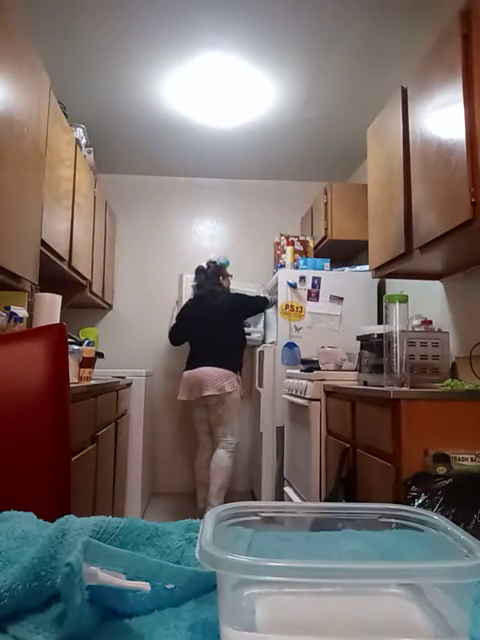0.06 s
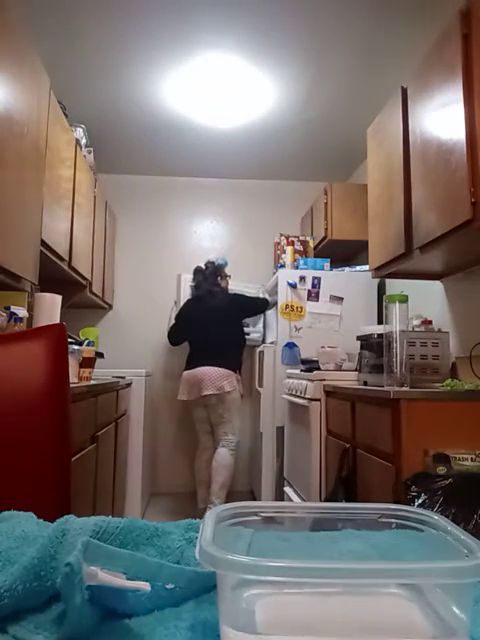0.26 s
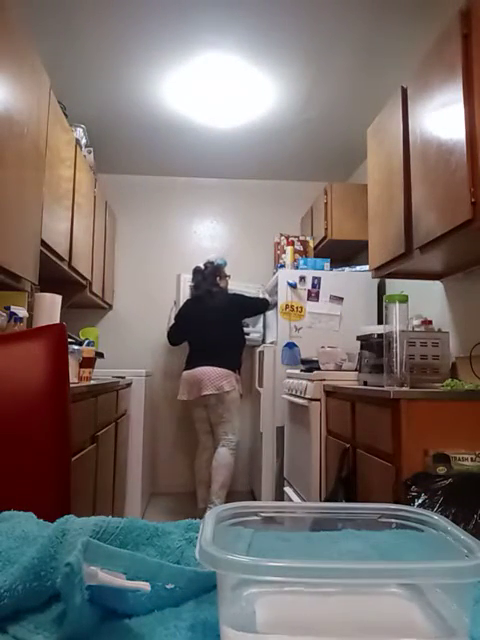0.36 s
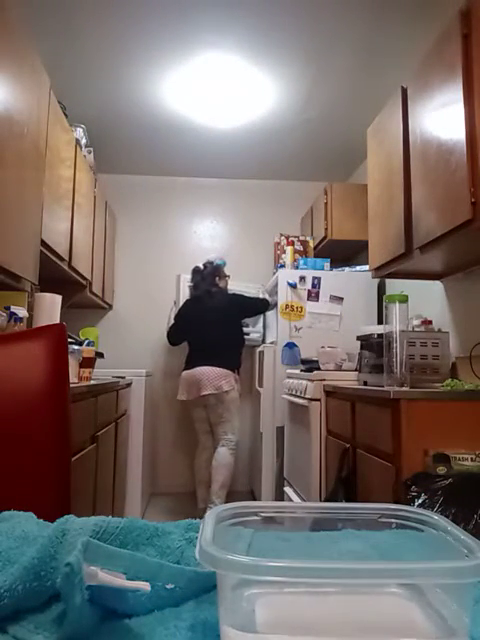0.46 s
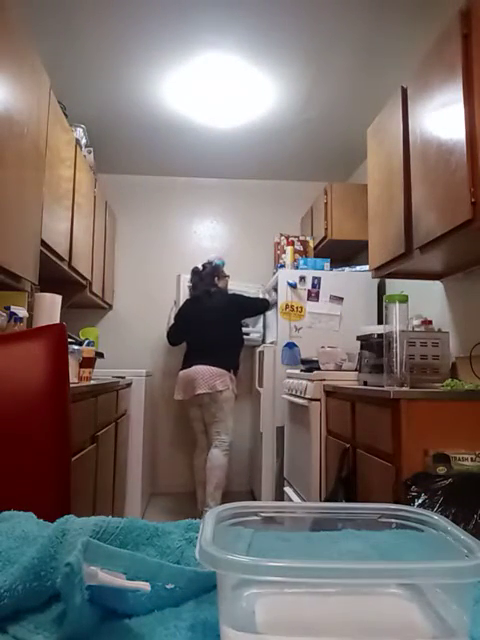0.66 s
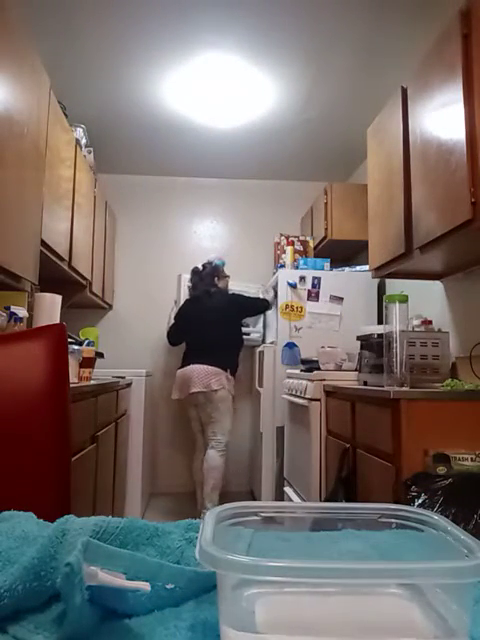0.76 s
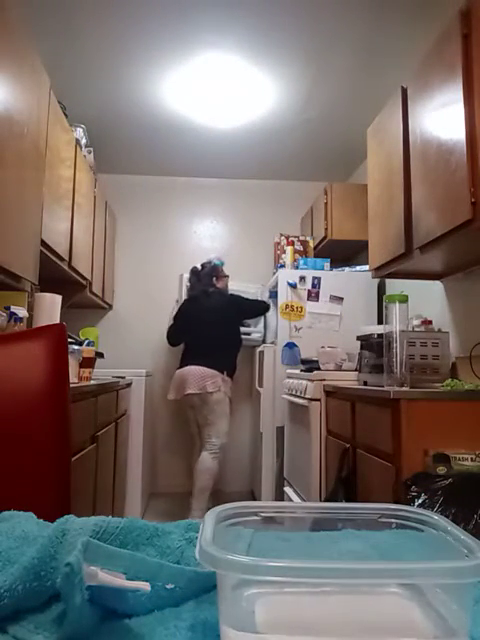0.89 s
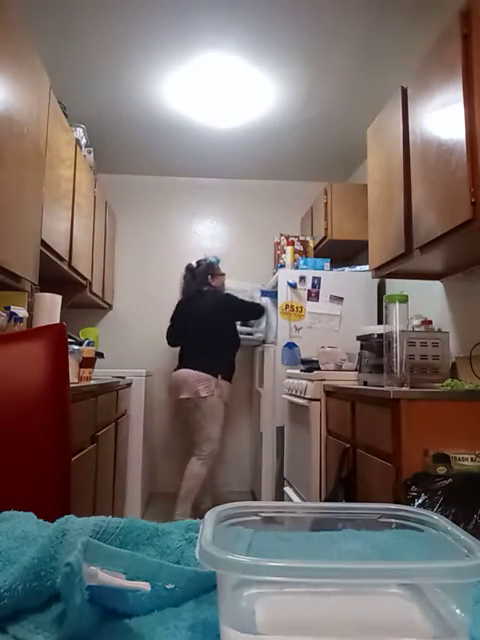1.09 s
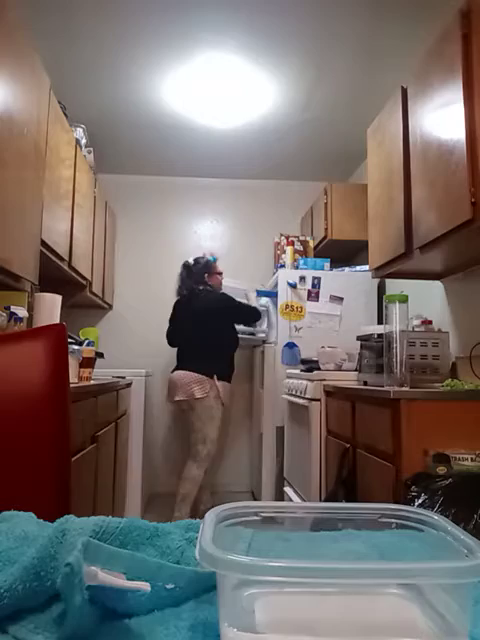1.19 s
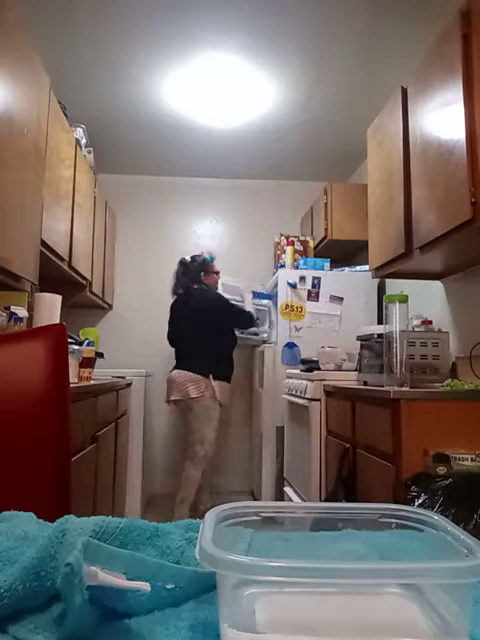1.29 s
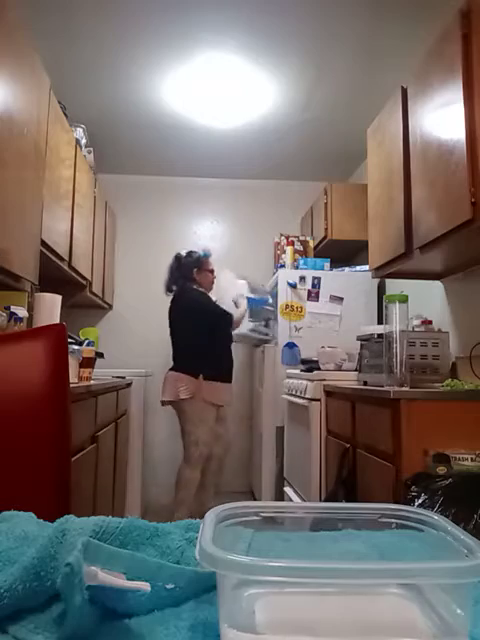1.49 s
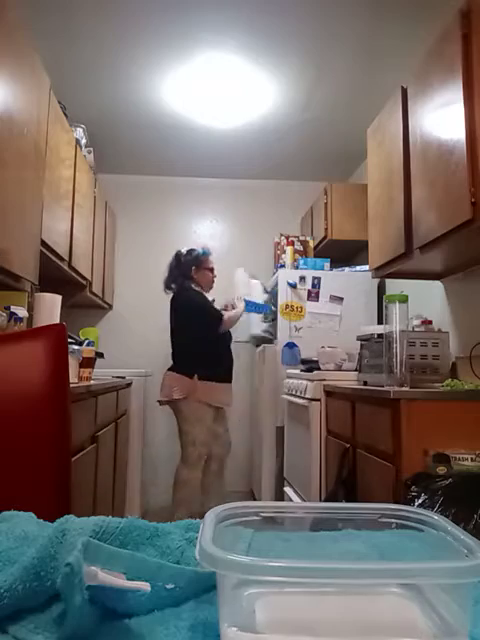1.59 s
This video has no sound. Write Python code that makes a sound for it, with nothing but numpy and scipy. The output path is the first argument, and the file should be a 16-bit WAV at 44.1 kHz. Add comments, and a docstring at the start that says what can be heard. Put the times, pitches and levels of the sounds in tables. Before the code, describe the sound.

Plastic containers clatter and thump as someone rummages in a humming kitchen freezer.

```python
"""Hard plastic containers are handled in an open freezer, heard across a small, hard-walled kitchen.
The freezer's fan and motor hum throughout. Plastic snaps and clinks, containers knock and the cabinet
thumps: each hit is a short burst plus fading tones. Many tiny slips make the shelf rumble under a
dragged load, a package rustle as it slides out and a container scrape. The container also strikes home
with one dry click. All the handling echoes off the kitchen walls."""
import sys
import numpy as np
from scipy import signal
from scipy.fft import rfft, irfft, next_fast_len
from scipy.io import wavfile
from scipy.ndimage import map_coordinates

SR = 44100
rng = np.random.default_rng(int(sys.argv[2]) if len(sys.argv) > 2 else 0)


def master_out(mix):
    """Clip the mix to full scale and print it as 16-bit PCM to the path in sys.argv[1]."""
    frames = np.transpose(np.atleast_2d(mix))
    ceiling = np.clip(frames, -1, 1)
    pcm = np.round(ceiling * 32767).astype(np.int16)
    wavfile.write(sys.argv[1], SR, pcm)


N = 72765  # samples: 1.65 s

# tone colour of cracking plastic, for snaps and the clink: f/Hz, level/dB
CRACK_COLOUR = [(60, -19), (300, -3.5), (600, -2), (1300, -8), (2000, -2), (2700, -9.5), (4400, -5),
                (5900, -11), (7200, -5.5), (9400, -9.5), (11000, -1), (13500, -8), (15500, -14)]


def amp(db):
    """Turn decibels into a factor to multiply by."""
    return 10 ** (np.asarray(db) / 20)


def along(points, hz):
    """Read a curve of (frequency, value) points at hz, on a scale of octaves."""
    freqs, values = np.transpose(points)
    return np.interp(np.log(hz + 1), np.log(freqs + 1), values)


def norm(x):
    """Scale a sound to an energy of 1."""
    return x / (np.linalg.norm(x) + 1e-12)


def add(track, s, sound):
    """Mix a sound into the track at s seconds."""
    part = track[round(s * SR):][:len(sound)]
    part += sound[:len(part)]


def burst(colour, tilt_db=0, size=4096):
    """A short burst with this tone colour, made brighter by tilt_db per octave above 250 Hz."""
    hz = np.fft.rfftfreq(size, 1 / SR)
    levels_db = along(colour, hz) + tilt_db * np.log2(np.maximum(hz, 250))
    # folding the cepstrum (a transform of the levels) packs the energy at the start
    cepstrum = irfft(np.log(amp(levels_db)))
    cepstrum[1:size // 2] *= 2
    cepstrum[size // 2 + 1:] = 0
    return norm(irfft(np.exp(rfft(cepstrum))))


def ring(tones, size=4096, attack_s=0.00028):
    """A struck object's own tones, a little different at each hit; wider tones die sooner."""
    t = np.arange(size) / SR
    waves = np.zeros(size)
    for hz, width_hz, db in tones:
        fade = amp(db + rng.normal(0, 1)) * width_hz * np.exp(-np.pi * width_hz * t)
        waves += fade * np.sin(2 * np.pi * (hz * t + rng.random()))
    return norm(waves * (1 - np.exp(-t / attack_s)))


def kitchen(early_db, early_s):
    """Room echo: early echoes peak at early_s, early_db above a tail whose treble dies first."""
    # how long the echo takes to fall by 60 dB: f/Hz, t/s
    fade_times = [(100, 0.83), (300, 0.47), (1000, 0.4), (3000, 0.4), (7000, 0.24), (11000, 0.22),
                  (16000, 0.1)]
    hz, t, noise = signal.stft(rng.standard_normal(SR * 3 // 4), SR, nperseg=256)
    fade = amp(-60 * t / along(fade_times, hz)[:, None])
    tail = signal.istft(noise * fade, SR, nperseg=256)[1]
    t = np.arange(len(tail)) / SR
    tail *= 1 - np.exp(-t / 0.0033)
    early = rng.standard_normal(len(t)) * t * np.exp(-t / early_s)
    return norm(norm(tail) + amp(early_db) * norm(early))


def hit(crack, ringing, early_db, early_s, direct_db):
    """One hit across the room: crack and ring bounce off the walls; the ring also arrives straight."""
    heard = signal.fftconvolve(crack + ringing, kitchen(early_db, early_s))
    add(heard, 0, amp(direct_db) * ringing)
    return norm(heard) * np.sqrt(SR / 50)  # as much energy as 20 ms at full level


def rub(length_s, slip_sound, early_db, slips_per_s=900, spread_db=6):
    """Rubbing heard across the room: many tiny slips of random strength that swell and fade."""
    n = int(length_s * SR)
    slipping = rng.random(n) < slips_per_s / SR
    slips = slipping * rng.choice([-1, 1], n) * amp(spread_db * rng.standard_normal(n))
    rubbed = signal.fftconvolve(slips * np.hanning(n) ** 0.35, slip_sound)
    heard = signal.fftconvolve(rubbed, kitchen(early_db, early_s=0.0015))
    return norm(heard) * np.sqrt(n)  # as much energy as length_s at full level


def fan(level_db=-47.5):
    """The fan moves air with a steady rush."""
    # tone colour of the moving air: f/Hz, level/dB
    colour = [(30, -48), (50, -51), (70, -14.5), (100, -17), (130, -10), (177, -14.5), (240, -4.5),
              (300, -4.5), (400, -14), (510, -9), (670, -24), (890, -18), (1000, -30), (1100, -20.5),
              (1220, -44), (1450, -32), (1570, -27), (1820, -34), (2400, -20.5), (2700, -29.5),
              (3100, -24.5), (4600, -25.5), (5600, -30), (11000, -33.5), (15500, -40.5)]
    gains = amp(along(colour, np.fft.rfftfreq(N, 1 / SR)))
    air = irfft(rfft(rng.standard_normal(N)) * gains, N)
    return amp(level_db) * norm(air) * np.sqrt(N)


def motor(waver_db=1.6, waver_radians=0.13, wavers_per_s=14):
    """The motor hums with a few tones, each slightly unsteady in level and pitch."""
    # motor tones: f/Hz, level/dB
    tones = [(247.6, -53), (899, -60.5), (2040, -68.5), (2460, -64.5), (3063, -68), (3182, -68)]
    t = np.arange(N) / SR

    def wobble():
        """A smooth random curve."""
        points = rng.standard_normal(int(t[-1] * wavers_per_s) + 4)
        return map_coordinates(points, [t * wavers_per_s])

    out = np.zeros(N)
    for hz, db in tones:
        strength = amp(db + waver_db * wobble()) * np.sqrt(2)
        out += strength * np.sin(2 * np.pi * (hz * t + rng.random()) + waver_radians * wobble())
    return out


def shelf_rumbles():
    """The shelf rumbles under a dragged load."""
    # drags: t/s, length/s, level/dB
    drags = [(0.168, .06, -39), (.51, 0.055, -40.5), (1.099, 0.0954, -39.5)]
    # tone colour of the shelf: f/Hz, level/dB
    colour = [(30, -50), (120, -16), (205, -6), (245, 7.5), (290, -12), (450, -12.5), (800, -34.5),
              (4000, -71)]
    out = np.zeros(N)
    for s, length_s, db in drags:
        add(out, s, amp(db) * rub(length_s, burst(colour), early_db=8.5))
    return out


def container_knocks():
    """Containers bump the shelf with a hollow clack."""
    # bumps: t/s, level/dB, tilt/(dB per octave), ring/dB, early echo delay/s, early echo level/dB
    knocks = [(.231, -30.5, 0.5, -32, .0028, -5.5), (.246, -31.5, -0.5, -10.5, 0.0026, -5.5),
              (.303, -30.5, -1.5, -13, .0034, -2), (.385, -33, -4.5, -14, 0.0026, -6),
              (0.6335, -36, -1, -8.5, 0.0063, -13), (0.7211, -29.5, 1, -1, .0011, -5.5),
              (0.725, -25.5, 3.5, -0.5, 0.0021, -5.5), (.769, -34, 2.5, -7, 0.0014, -6),
              (.7785, -32.5, 0.5, -21, 0.0014, -3), (.793, -39, -2, 5, 0.0008, 15),
              (0.8067, -29.5, -6.5, -9.5, 0.0022, 3), (.908, -51, -3.5, -6, 0.0035, 6),
              (0.9637, -36, -1.5, -4.5, 0.004, -6), (1.009, -38.5, 1, -5, 0.00094, -2),
              (1.08, -42.5, -1.5, -3, 0.0095, 1)]
    # tone colour of a bump: f/Hz, level/dB
    colour = [(30, -57), (80, -26), (250, 1), (500, 6), (700, -4.5), (950, 0), (1350, -3), (2000, 0.5),
              (2900, -7), (4200, -9.5), (5500, -15), (8000, -16), (12000, -16.5), (15500, -36)]
    # ringing of the container: f/Hz, width/Hz, level/dB
    tones = [(519, 30, 2.5), (987.7, 16, 11.5), (1127, 11.5, 7), (1864, 130, -1), (2280, 12, 1),
             (3660, 220, -1), (3900, 400, -3.5)]
    out = np.zeros(N)
    for s, db, tilt_db, ring_db, early_s, early_db in knocks:
        ringing = amp(ring_db) * ring(tones)
        add(out, s, amp(db) * hit(burst(colour, tilt_db), ringing, early_db, early_s, direct_db=-2.5))
    return out


def cabinet_thumps(ring_db=3):
    """The cabinet answers heavier bumps with a short, soft-edged boom."""
    # dull thumps: t/s, level/dB
    thumps = [(.246, -35), (.3, -37), (.36, -38), (0.421, -33), (0.641, -41.5), (0.681, -37.5),
              (.775, -31.5), (.806, -33), (0.816, -36), (.831, -33.5), (0.916, -42.5), (1.01, -39),
              (1.075, -37), (1.122, -39.5), (1.158, -37.5), (1.199, -49), (1.452, -42.5)]
    # tone colour of a thump: f/Hz, level/dB
    colour = [(30, -63), (70, -25), (125, 0.5), (200, -1.5), (245, 24), (310, -10), (470, -19), (700, 4.5),
              (1300, -25), (5000, -73)]
    # ringing of the cabinet: f/Hz, width/Hz, level/dB
    tones = [(135, 13, -10.5), (204.2, 8.2, -3), (243.8, 9.6, 3.5), (309.6, 8.8, -4), (417, 4.3, -16.5),
             (453.6, 14, -10.5), (525, 3.2, -17)]
    out = np.zeros(N)
    for s, db in thumps:
        ringing = amp(ring_db) * ring(tones, attack_s=0.0012)
        add(out, s, amp(db) * hit(burst(colour), ringing, early_db=1.5, early_s=0.0044, direct_db=3))
    return out


def plastic_snaps():
    """Hard plastic lets go with a bright crack; the hardest snap rings briefly."""
    # sharp snaps: t/s, level/dB, tilt/(dB per octave), ring/dB, early echo delay/s
    snaps = [(.286, -22.5, 4, -7, 0.0037), (0.2909, -22, 0.5, -1, 0.0017), (.443, -36, -2, -24, 0.0014),
             (0.55, -38, -1, -23, 0.0033), (0.617, -43.5, -2, -25, 0.0028),
             (0.694, -41.5, -3.5, -12, 0.0063)]
    # ringing of the snapped plastic: f/Hz, width/Hz, level/dB
    tones = [(3735, 550, -1.5), (5280, 95, -5), (7520, 140, 0.5), (8850, 100, 0.5), (10100, 370, 3.5),
             (10300, 140, -3), (11560, 100, 2.5), (12800, 150, -9.5)]
    out = np.zeros(N)
    for s, db, tilt_db, ring_db, early_s in snaps:
        crack = burst(CRACK_COLOUR, tilt_db)
        ringing = amp(ring_db) * ring(tones)
        add(out, s, amp(db) * hit(crack, ringing, early_db=-6, early_s=early_s, direct_db=-5.5))
    return out


def plastic_clink(ring_db=1):
    """A second hard piece is tapped once: a noisy crack and a brief ring."""
    # the tap: t/s, level/dB
    taps = [(0.3965, -31)]
    # ringing of the piece: f/Hz, width/Hz, level/dB
    tones = [(2410, 270, -6), (4520, 230, 0.5), (6240, 480, -7), (9100, 510, -4), (10840, 500, -2),
             (13650, 500, -12)]
    out = np.zeros(N)
    for s, db in taps:
        crack = burst(CRACK_COLOUR, tilt_db=-0.9)
        ringing = amp(ring_db) * ring(tones)
        add(out, s, amp(db) * hit(crack, ringing, early_db=1, early_s=0.003, direct_db=-8))
    return out


def package_rustles():
    """The package rustles as it slides."""
    # slides: t/s, length/s, level/dB, tilt/(dB per octave)
    slides = [(0.49, 0.14, -48, -0.5), (0.613, 0.059, -41.5, 0), (.755, 0.079, -32.5, -1.4),
              (0.889, 0.065, -47, -1), (0.978, 0.079, -41, 0), (1.058, 0.053, -38.5, -5.5),
              (1.122, 0.08, -49.5, 8.5), (1.467, 0.19, -57.5, -7)]
    # tone colour of the rustle: f/Hz, level/dB
    colour = [(30, -54), (100, -14.5), (400, 3.5), (900, 6.5), (1400, -0.5), (2300, 1.5), (4200, 0.5),
              (5500, -9), (11500, -13.5), (15500, -30)]
    out = np.zeros(N)
    for s, length_s, db, tilt_db in slides:
        add(out, s, amp(db) * rub(length_s, burst(colour, tilt_db), early_db=0.5))
    return out


def container_click():
    """The container strikes home: a stiff edge gives a click that is over almost at once."""
    # the dry click: t/s, level/dB
    clicks = [(0.7253, -29)]
    # tone colour of the click: f/Hz, level/dB
    colour = [(2300, -27), (3500, -4), (4200, -1), (5600, -23)]
    out = np.zeros(N)
    for s, db in clicks:
        heard = signal.fftconvolve(burst(colour), kitchen(early_db=9, early_s=0.003))
        add(out, s, amp(db) * norm(heard) * np.sqrt(SR / 50))
    return out


def container_scrapes():
    """A container rasps over the shelf in short pushes."""
    # pushes: t/s, length/s, level/dB, tilt/(dB per octave)
    pushes = [(0.762, 0.027, -29, 0.5), (0.898, 0.027, -40, -1), (0.967, 0.021, -40.5, 0.5),
              (1.006, 0.054, -44, 4), (1.398, 0.053, -46.5, 1)]
    # tone colour of the rasp: f/Hz, level/dB
    colour = [(30, -55), (400, -9), (1200, -16.5), (1600, -3), (2300, 0), (3000, -3.5), (4200, -2.5),
              (5500, -17.5), (11500, -22.5), (15500, -36)]
    out = np.zeros(N)
    for s, length_s, db, tilt_db in pushes:
        add(out, s, amp(db) * rub(length_s, burst(colour, tilt_db), early_db=1.5))
    return out


def scene():
    """All the handling over the freezer's hum, in one channel."""
    hum = fan() + motor()
    hits = container_knocks() + cabinet_thumps() + plastic_snaps() + plastic_clink() + container_click()
    rubbing = shelf_rumbles() + package_rustles() + container_scrapes()
    return (hum + hits + rubbing)[None]


def record(dry):
    """Weaken the deep bass and remove the very highest treble."""
    low_cut_hz, top_hz = 63, 15800
    thinned = signal.sosfilt(signal.butter(2, low_cut_hz, "high", fs=SR, output="sos"), dry)
    size = next_fast_len(N + SR // 2)
    below_top = np.fft.rfftfreq(size, 1 / SR) < top_hz
    return irfft(rfft(thinned, size) * below_top, size)[:, :N]


dry = scene()
out = record(dry)
master_out(out)
```